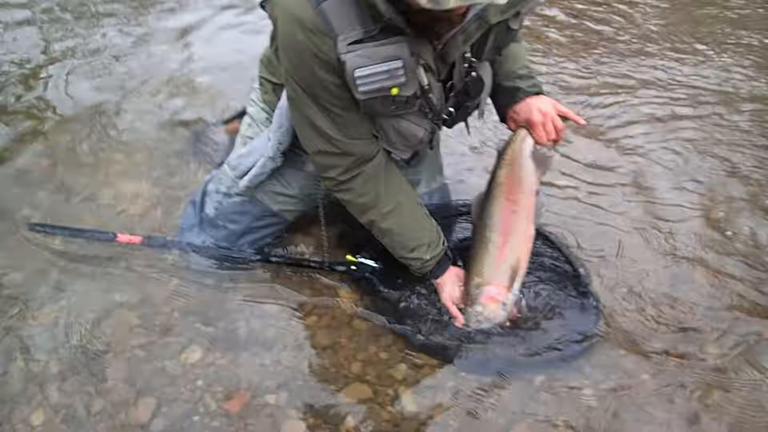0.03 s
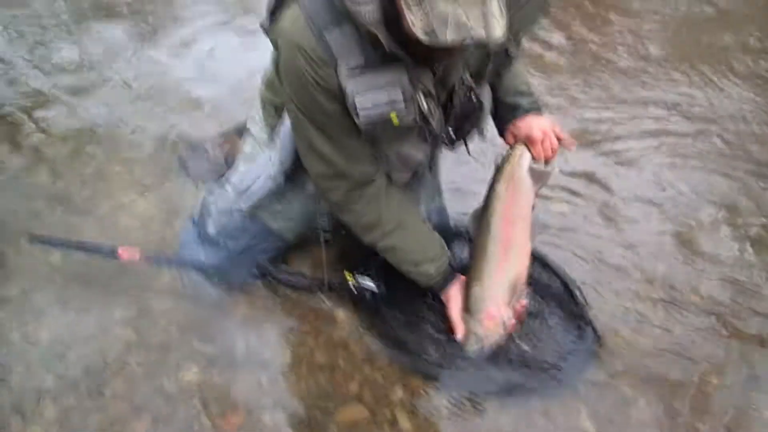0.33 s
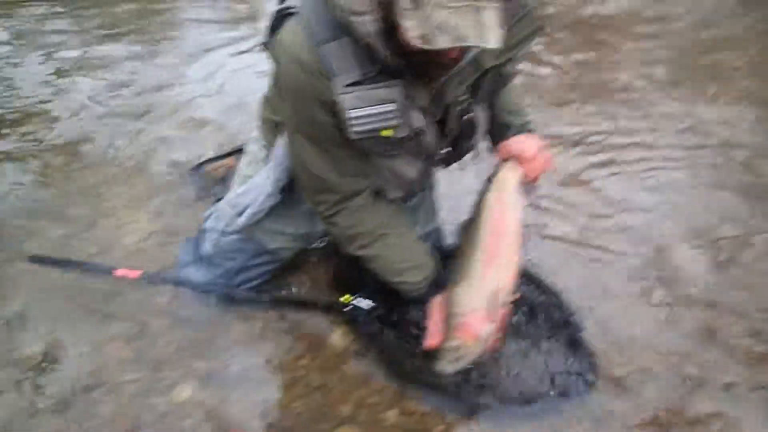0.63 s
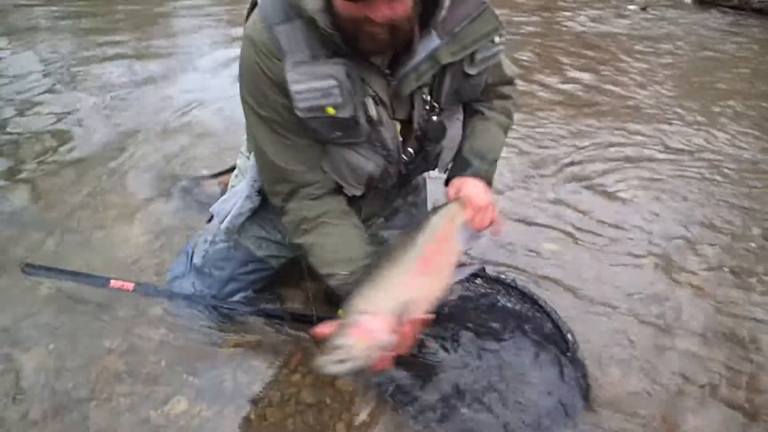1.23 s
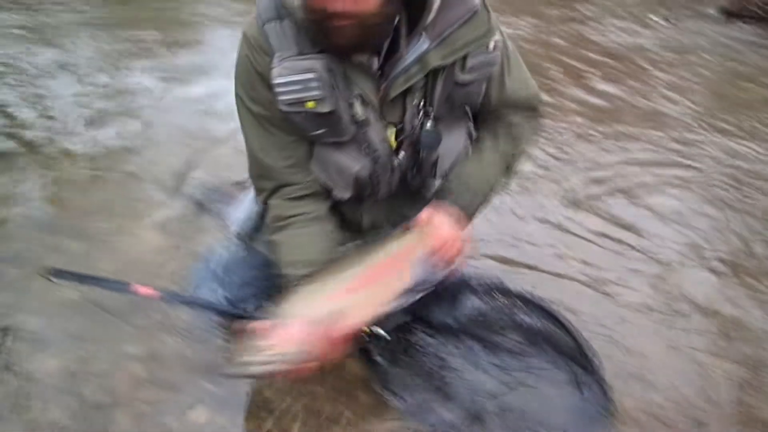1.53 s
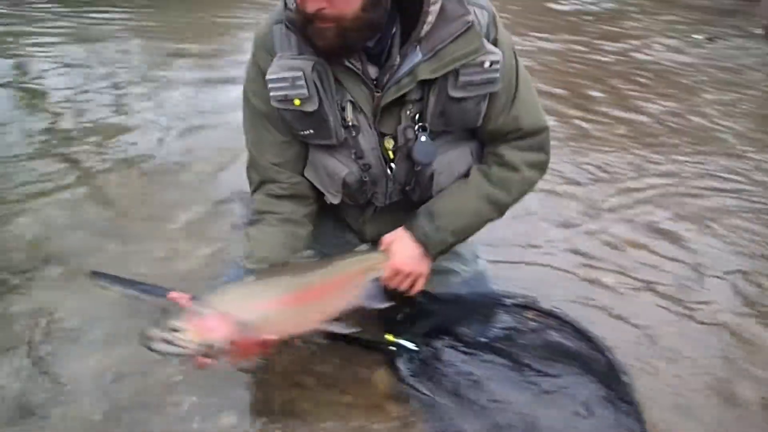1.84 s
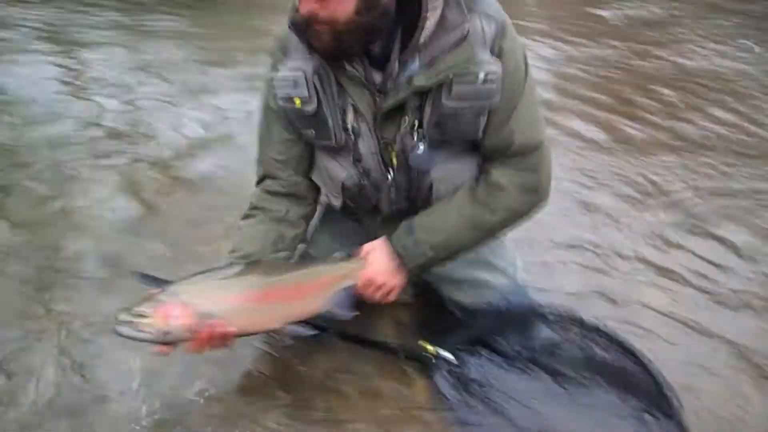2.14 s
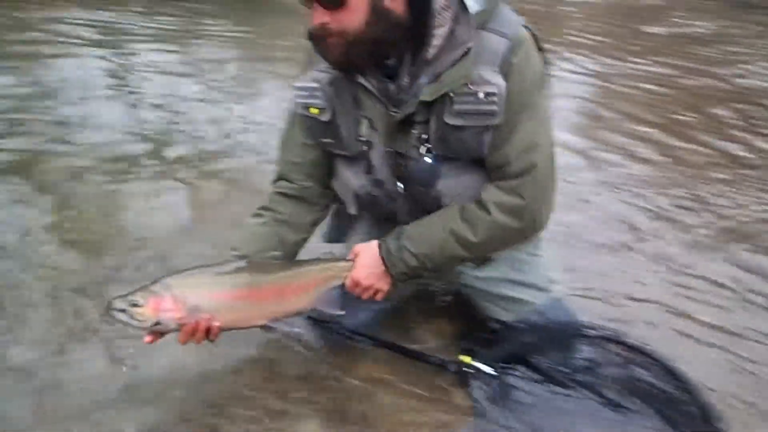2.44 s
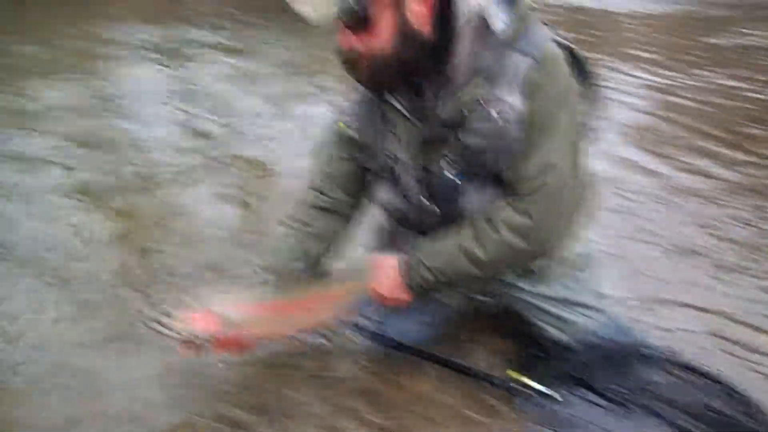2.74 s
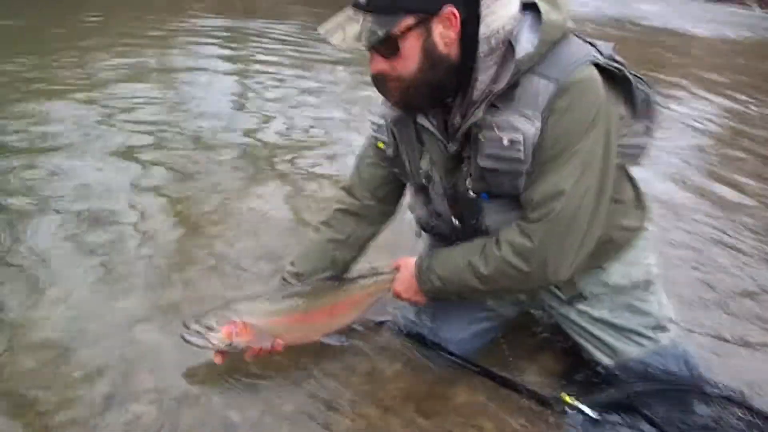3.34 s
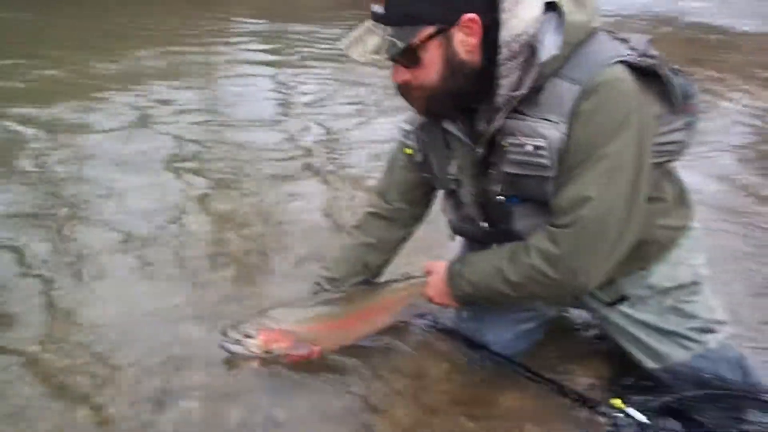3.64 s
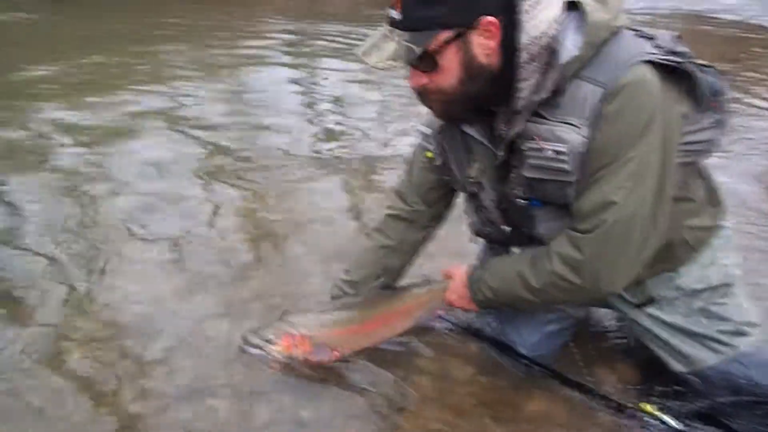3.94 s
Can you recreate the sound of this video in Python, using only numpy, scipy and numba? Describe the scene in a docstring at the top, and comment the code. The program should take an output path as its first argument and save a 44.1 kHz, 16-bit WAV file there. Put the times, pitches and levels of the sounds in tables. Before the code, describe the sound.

Water drips and patters into a shallow river as a fish is lifted from a landing net. The current washes softly underneath, with small plops, and two sharp handling knocks hit the close, hand-held microphone in the first half.

```python
"""A shallow river, where an angler lifts a fish from a landing net close to a hand-held camera.
The current is a wash of countless small bubbles. Water patters off fish and net in two swells,
with single pinging drops and the plops of larger bubbles.
Two sharp handling knocks ring the camera case, and its gain control ducks after them."""
import sys
import numpy as np
from scipy import signal
from scipy.fft import rfft, irfft
from scipy.io import wavfile
from scipy.ndimage import uniform_filter1d
from numba import njit

SR = 44100
rng = np.random.default_rng(int(sys.argv[2]) if len(sys.argv) > 2 else 0)


def generate_wav(signal):
    """Clip the signal to [-1, 1] and save it as 16-bit WAV at the path in sys.argv[1]."""
    frames = np.transpose(np.atleast_2d(signal))
    scaled = np.clip(frames, -1, 1) * 32767
    pcm = np.round(scaled).astype(np.int16)
    wavfile.write(sys.argv[1], SR, pcm)


N = 176400
BUBBLE_RISE = 0.15  # share of pitch gained as a bubble dies away


def undb(db):
    """Decibels to gain."""
    return 10 ** (np.asarray(db) / 20)


def unit(x):
    """Scale to rms 1."""
    return x / np.sqrt(np.mean(x ** 2))


def envelope(rows):
    """Gain over time from (s, dB) points."""
    return undb(np.interp(np.arange(N) / SR, *np.array(rows).T))


def per_bin(rows):
    """(Hz, value) points interpolated over log frequency to every FFT bin."""
    hz, value = np.array(rows, float).T
    return np.interp(np.log(np.arange(N // 2 + 1) * SR / N + 1), np.log(hz), value)


def colour(x, rows):
    """Minimum-phase filter of the given (Hz, dB) shape, unit power gain."""
    cepstrum = irfft(np.log(unit(undb(per_bin(rows)))), N)
    cepstrum[1:N // 2] *= 2
    cepstrum[N // 2 + 1:] = 0
    return irfft(rfft(x) * np.exp(rfft(cepstrum)), N)


def pan(left_over_right_db):
    """Left and right gains."""
    return undb(np.array([[left_over_right_db], [-left_over_right_db]]) / 2)


def flicker(rate_hz, rms_db):
    """Smooth random gain around 1."""
    hold = int(SR / rate_hz)
    steps = np.repeat(rng.standard_normal(N // hold + 1), hold)
    smooth = uniform_filter1d(uniform_filter1d(steps, hold), hold)
    return undb(rms_db * unit(smooth[:N]))


def add(out, start_s, sound):
    """Mix a short sound in at start_s."""
    i = int(start_s * SR)
    out[:, i:i + sound.shape[-1]] += sound[..., :N - i]


def ring(t, hz, t60_s, attack_s, rise=0):
    """Damped sine; pitch gains the share `rise` per t60."""
    t = np.maximum(t, 0)
    phase = 2 * np.pi * hz * (t + rise * t * t / (2 * t60_s))
    return np.sin(phase) * np.exp(-np.log(1000) * t / t60_s) * (1 - np.exp(-t / attack_s))


def stereo(source):
    """Two draws of source() as mid and side: alike in the bass, apart in the treble, leaning left."""
    # Each row: frequency in Hz, left-right correlation before clipping.
    likeness = [(60, 1.1), (130, 0.7), (300, 2), (1400, 0.84), (3000, 0.8), (4500, .5), (7000, 0.21),
                (15000, -0.45)]
    # Each row: frequency in Hz, left over right in dB.
    lean_db = [(40, 4.5), (700, 4), (1300, 4), (2400, 0), (3000, 2), (4400, 4), (8000, 0), (15000, 0.5)]
    correlation = np.clip(per_bin(likeness), 0, 0.97)
    mid = rfft(source()) * np.sqrt((1 + correlation) / 2)
    side = rfft(source()) * np.sqrt((1 - correlation) / 2)
    lean = undb(per_bin(lean_db) / 2)
    return irfft(np.array([(mid + side) * lean, (mid - side) / lean]), N)


@njit
def sum_bubbles(start_sample, hz, cycles, size, rise):
    """Each bubble rings as a short, rising, damped sine."""
    out = np.zeros(N)
    for k in range(len(hz)):
        first, length = int(start_sample[k]), int(cycles[k] * SR / hz[k])
        phasor = size[k] * np.sqrt(hz[k] / cycles[k]) + 0j
        omega = 2 * np.pi * hz[k] / SR
        step = np.exp(1j * omega - 6 / length)
        glide = np.exp(1j * omega * rise / length)
        for i in range(first, min(N, first + length)):
            out[i] += phasor.imag
            phasor *= step
            step *= glide
    return out


def swarm(count, low_hz, high_hz, cycles, spread_db):
    """Bubbles of random time, pitch and strength; flat spectrum between the edges, rms 1."""
    when, pitch, life, rank = rng.random((count, 4)).T
    hz = low_hz * (high_hz / low_hz) ** pitch
    strength = undb(-spread_db * np.log(rank + 0.005))
    return unit(sum_bubbles(when * N, hz, cycles * (0.5 + life), strength * np.sqrt(hz), BUBBLE_RISE))


def river():
    """Small bubbles and longer-ringing eddy gurgles over the smooth wash of farther water."""
    # Current spectrum. Each row: frequency in Hz, relative density in dB.
    spectrum = [(15, -29.5), (25, -2.5), (80, -5), (130, -3), (195, -6), (255, -1), (350, 0), (520, -1),
                (640, 0.5), (780, -4), (900, -4), (1060, -5.5), (1300, -14), (1580, -10), (1800, -12),
                (1950, -22.5), (2100, -24.5), (2320, -5), (2700, -3.5), (3450, -12.5), (4000, -10.5),
                (4800, -20.5), (7000, -26), (9000, -28.5), (15500, -35.5)]
    # Current as the camera turns. Each row: time in seconds, level in dB.
    level = [(0, -41), (1.3, -40.5), (2.0, -42), (2.8, -40.5), (3.4, -41), (4.0, -42)]

    def current():
        fine = swarm(count=24000, low_hz=179.3, high_hz=14000, cycles=17.6, spread_db=3)
        gurgle = swarm(count=420, low_hz=219.3, high_hz=1194, cycles=27, spread_db=2.2)
        wash = rng.standard_normal(N)
        return colour(fine + undb(-19.17) * gurgle + undb(-0.5) * wash, spectrum)
    return unit(stereo(current)) * envelope(level) * flicker(rate_hz=9, rms_db=0.5)


def hand_rumble():
    """The hand turning the camera makes a faint rumble and soft bumps."""
    # Rumble spectrum. Each row: frequency in Hz, relative density in dB.
    spectrum = [(25, -7), (70, -4), (135, 2), (200, -6.5), (330, -4), (500, -16.5), (900, -37.5)]
    # Rumble. Each row: time in seconds, level in dB.
    level = [(1.4, -63), (1.9, -52.5), (2.6, -53.5), (3.0, -60), (3.3, -68)]
    # Each row: start in seconds, pitch in Hz, level in dB.
    bumps = [(2.262, 137, -35), (2.516, 156, -32), (2.84, 140, -32.5)]
    t = np.arange(SR // 6) / SR
    out = stereo(lambda: colour(rng.standard_normal(N), spectrum)) * envelope(level)
    for start_s, hz, db in bumps:
        add(out, start_s, undb(db) * pan(4) * ring(t, hz, t60_s=0.083, attack_s=0.0032))
    return out


def case_knocks():
    """Hard knocks ring the camera case, which passes little bass; each rebounds once."""
    # Each row: start in seconds, gain in dB, left over right in dB, left lag in seconds,
    # low-pass edge in Hz, rebound delay in seconds, rebound gain in dB.
    knocks = [(.0890, 1, -0.5, -.00003, 3000, .0052, -10), (1.4690, 3.5, 8.5, .0001, 7500, .0036, -11.5)]
    # Case resonances. Each row: frequency in Hz, gain in dB, t60 in seconds.
    modes = [(2537, -2, 0.0096), (2940, -7, 0.0047), (3480, -11, 0.0037), (6940, -24.5, 0.0036)]
    contact_s, thud_db = 0.00029, -10
    t, out = np.arange(SR // 6) / SR, np.zeros((2, N))
    highpass = signal.butter(4, 1990, "high", fs=SR, output="sos")
    for start_s, db, side_db, lag_s, bright_hz, rebound_s, rebound_db in knocks:
        t_stereo = t - np.array([[lag_s], [-lag_s]]) / 2
        ringing = sum(undb(mode_db) * ring(t_stereo, hz, t60_s, contact_s) for hz, mode_db, t60_s in modes)
        case = signal.sosfilt(signal.butter(4, bright_hz, fs=SR, output="sos"), ringing)
        knock = undb(db) * pan(side_db) * (signal.sosfilt(highpass, case) + undb(thud_db) * case)
        add(out, start_s, knock)
        add(out, start_s + rebound_s, undb(rebound_db) * knock)
    return out


def plops():
    """Larger air pockets ring and climb in pitch as they surface."""
    # Each row: start in seconds, pitch in Hz, level in dB, t60 in seconds.
    bubbles = [(.092, 762, -27.5, .03), (.129, 703, -29.5, 0.044), (.446, 476, -31.5, 0.088),
               (.455, 513, -32, 0.055), (.4675, 545, -22, .11), (.4685, 657, -18.5, 0.037),
               (0.584, 1560, -35.5, 0.09), (.73, 1810, -33, .025), (1.635, 520, -23.5, 0.022),
               (1.962, 330, -32.5, 0.059), (2.209, 1016, -26.5, 0.052), (2.352, 290, -36, .05),
               (2.863, 1056, -31, 0.033), (2.907, 1450, -34.5, .035), (2.919, 1790, -31, 0.023),
               (3.321, 1820, -28.5, 0.029), (3.346, 2210, -25.5, .02)]
    t, out = np.arange(SR // 6) / SR, np.zeros((2, N))
    for start_s, hz, db, t60_s in bubbles:
        add(out, start_s, undb(db) * pan(4.6) * ring(t, hz, t60_s, attack_s=0.0011, rise=BUBBLE_RISE))
    return out


def spits():
    """Flung spray lands as short, bright noise bursts."""
    # Each row: start in seconds, level in dB.
    bursts = [(.113, -40), (.221, -42), (.357, -40), (.479, -36), (.599, -39), (.628, -36.5), (.852, -39.5),
              (.910, -41), (1.55, -37.5), (2.064, -40), (3.464, -43)]
    # Burst spectrum. Each row: frequency in Hz, relative density in dB.
    spectrum = [(2000, -20), (3800, 6), (5000, 0), (7500, -4), (9000, -17), (15000, -31)]
    decay_s = 0.004
    t, out = np.arange(SR // 10) / SR, np.zeros((2, N))
    for start_s, db in bursts:
        add(out, start_s, undb(db) * rng.standard_normal((2, len(t))) * np.exp(-t / decay_s))
    return colour(out, spectrum)


def drops():
    """Each drop striking the water makes a brief splash and a high ping."""
    # Each row: time in seconds, ping gain in dB, pitch in Hz, left over right in dB, splash gain in dB.
    impacts = [(.107, -27, 2660, 3, -36), (0.1247, -29, 2800, 6, -32), (0.1332, -31, 3400, 7, -29.5),
               (.170, -24, 2560, 1, -43), (0.22, -35, 2830, 8, -36), (0.271, -26.5, 2670, 3, -50),
               (0.337, -22.5, 3020, 6, -46), (.358, -38, 2330, 4, -42), (0.4676, -20.5, 3010, 4, -33.5),
               (0.4768, -22.5, 3340, 6, -36), (0.5108, -28, 2820, 5, -44), (0.548, -24.5, 2600, 6, -29.5),
               (.5695, -17.5, 2810, 1, -44), (0.586, -28, 2870, 5, -30.5), (0.5951, -22.5, 2640, 1.5, -42),
               (0.626, -21.5, 4000, 5, -35), (.629, -19.5, 3070, 5, -32), (0.641, -26, 2640, 2, -46),
               (0.6613, -28, 2730, 3, -36), (0.7978, -33, 2270, 5, -33), (0.8118, -30, 2610, 1, -34.5),
               (.8679, -30, 3010, 3, -47), (0.8858, -24.5, 2780, -1, -47), (0.9351, -28, 3640, 4, -32),
               (1.1008, -22.5, 2910, 1, -29), (1.1448, -29, 2760, 0, -31), (1.551, -29, 4150, 1, -44),
               (2.0623, -27, 3000, 2, -34), (2.131, -29, 3990, 2, -37), (2.166, -30, 4100, 2, -38),
               (2.2047, -24, 2960, 3, -33), (2.3303, -27, 2590, -1, -37), (2.6489, -29.5, 3620, 5, -47),
               (2.906, -22.5, 3100, 3, -30.5), (3.2312, -28, 2760, 3, -32), (3.3189, -24.5, 2770, 3, -30.5),
               (3.3437, -27, 2650, 1, -35), (3.953, -33.5, 3850, 11, -42)]
    # Each row: frequency in Hz, relative density in dB.
    splash_spectrum = [(300, -22), (1000, -7), (1600, -1), (2050, -10.5), (2650, 7), (3200, 1), (4200, -1),
                       (5200, -17.5), (7500, -18.5), (9500, -33.5), (15000, -43.5)]
    delay_s, splash_decay_s = 0.0005, 0.0035
    t = np.arange(SR // 10) / SR
    pings, splashes = np.zeros((2, 2, N))
    for time_s, ping_db, hz, side_db, splash_db in impacts:
        ping = ring(t, hz, t60_s=0.02, attack_s=0.0005, rise=0.042)
        noise = rng.standard_normal((3, len(t)))  # common, left, right
        splash = (noise[0] + 0.5 * noise[1:]) * np.exp(-t / splash_decay_s)
        add(pings, time_s + delay_s, undb(ping_db) * pan(side_db) * ping)
        add(splashes, time_s + delay_s, undb(splash_db) * pan(side_db) * splash)
    return pings + undb(-1.5) * colour(splashes, splash_spectrum)


def runoff():
    """Water off fish and net: dense patter, a thin ringing dribble and fine spray above."""
    # Each row: frequency in Hz, relative density in dB.
    patter_spectrum = [(500, -19.5), (1300, -19.5), (1580, -13), (2000, -22), (2350, -8), (2600, 0.5),
                       (2950, 0.5), (3400, -6), (4100, -6), (5000, -26), (7400, -26.5), (9000, -36),
                       (15000, -54)]
    spray_spectrum = [(2500, -12), (4000, -5.5), (5500, -2), (6500, 0), (7500, 2.5), (8600, -11),
                      (11000, -20), (15000, -28)]
    # Each row: time in seconds, level in dB.
    patter_level = [(.09, -39.5), (.2, -48), (.3, -55), (.45, -49), (.58, -44.5), (.72, -49.5), (.88, -45),
                    (1.02, -45), (1.17, -38), (1.42, -43.5), (1.58, -44.5), (1.85, -40), (2.06, -38),
                    (2.28, -42), (2.6, -42), (3.0, -48), (3.4, -47), (4.0, -71)]
    dribble_level = [(.1, -44), (.3, -49), (.45, -47), (.6, -42.5), (.75, -48.5), (.92, -46), (1.2, -45),
                     (1.6, -54), (2.2, -51), (3.2, -50), (4.0, -53)]
    spray_level = [(.1, -63), (.95, -62), (1.12, -54), (1.26, -50.5), (1.45, -56.5), (1.65, -56.5),
                   (2.0, -57), (2.5, -60), (3.2, -66)]
    patter = stereo(lambda: colour(
        swarm(count=16000, low_hz=697, high_hz=13000, cycles=9.1, spread_db=2), patter_spectrum))
    dribble = stereo(lambda: swarm(count=700, low_hz=2466, high_hz=3220, cycles=48, spread_db=2))
    spray = stereo(lambda: colour(
        swarm(count=24000, low_hz=2970, high_hz=12700, cycles=18, spread_db=0.5), spray_spectrum))
    return (unit(patter) * envelope(patter_level) * flicker(rate_hz=35.25, rms_db=0.6)
            + unit(dribble) * envelope(dribble_level)
            + unit(spray) * envelope(spray_level))


@njit
def follow_peak(x, release_s):
    """Peak follower: instant rise, exponential fall."""
    fall = np.exp(-1 / (release_s * SR))
    out, peak = np.empty(len(x)), 0.0
    for i in range(len(x)):
        out[i] = peak
        peak = max(x[i], peak * fall)
    return out


def scene():
    """River, dripping catch and camera handling."""
    return river() + runoff() + drops() + spits() + plops() + hand_rumble() + case_knocks()


def record(dry):
    """Housing notches, gain control ducking after loud peaks, an abrupt start and a steep top cut."""
    # Microphone housing dips. Each row: centre in Hz, width in Hz, depth from 0 to 1.
    notches = [(942, 78, 0.85), (1700, 76, 0.76), (2409, 69, 1)]
    threshold_db, ratio, slew_s = -12, 1.57, 0.0045
    start_s, fade_s, top_hz = 0.081, 0.008, 15750
    for hz, width_hz, depth in notches:
        dry = dry - depth * signal.lfilter(*signal.iirpeak(hz, hz / width_hz, fs=SR), dry)
    peak = follow_peak(np.abs(dry).max(axis=0), release_s=0.33)
    target_gain = np.maximum(peak / undb(threshold_db), 1) ** (1 / ratio - 1)
    pole = np.exp(-1 / (slew_s * SR))
    gain = 1 + signal.lfilter([1 - pole], [1, -pole], target_gain - 1)
    fade_in = np.clip((np.arange(N) / SR - start_s) / fade_s, 0, 1)
    lowpass = signal.ellip(10, 0.2, 70, top_hz, fs=SR, output="sos")
    return signal.sosfilt(lowpass, dry * gain * fade_in)


dry = scene()
out = record(dry)
generate_wav(out)
```